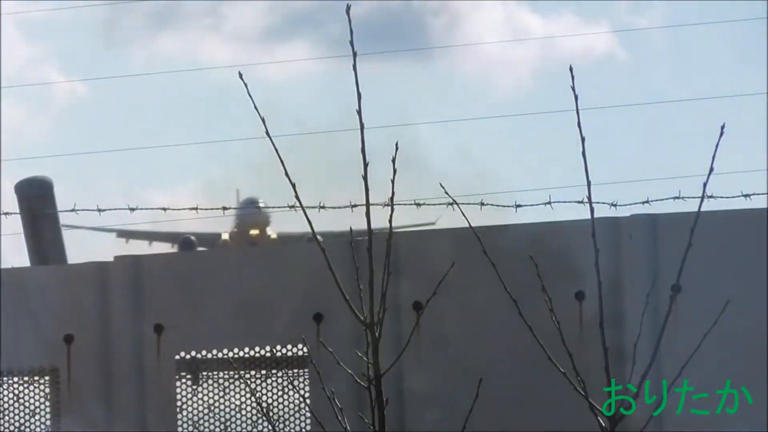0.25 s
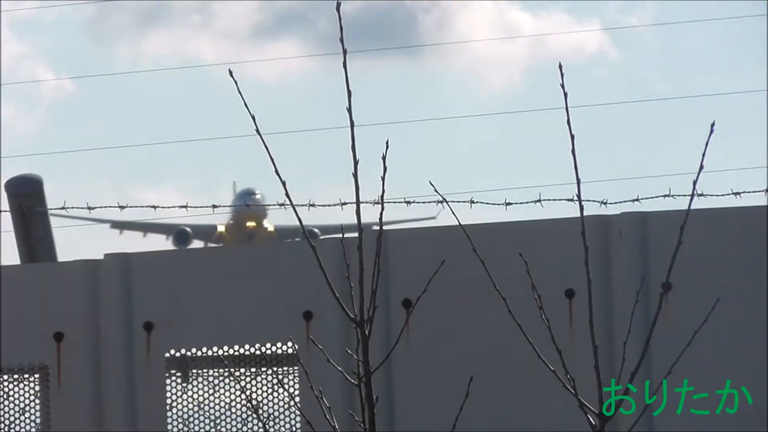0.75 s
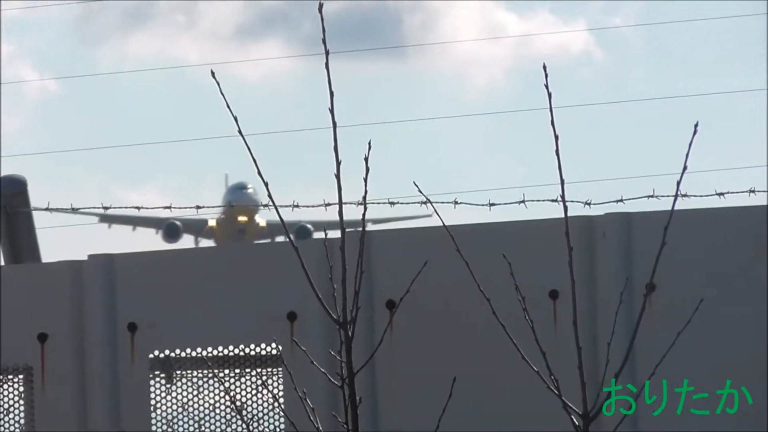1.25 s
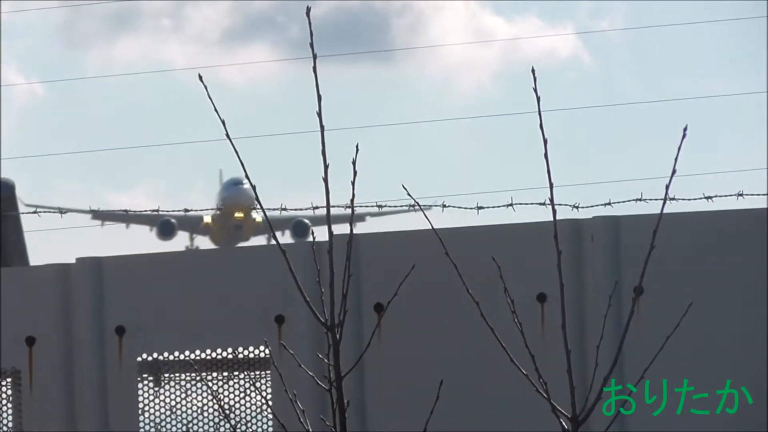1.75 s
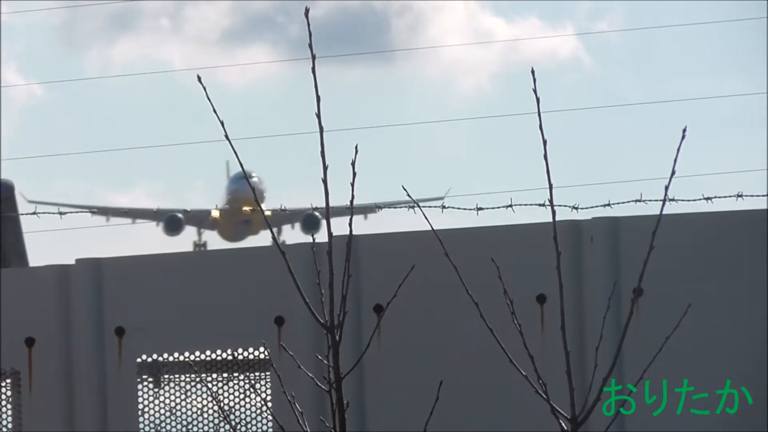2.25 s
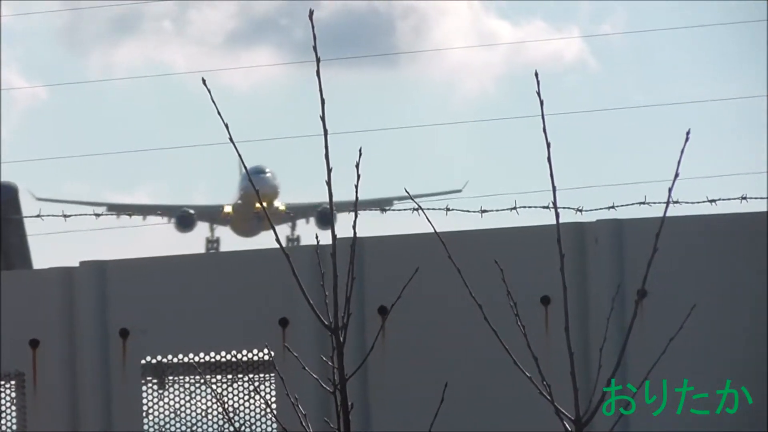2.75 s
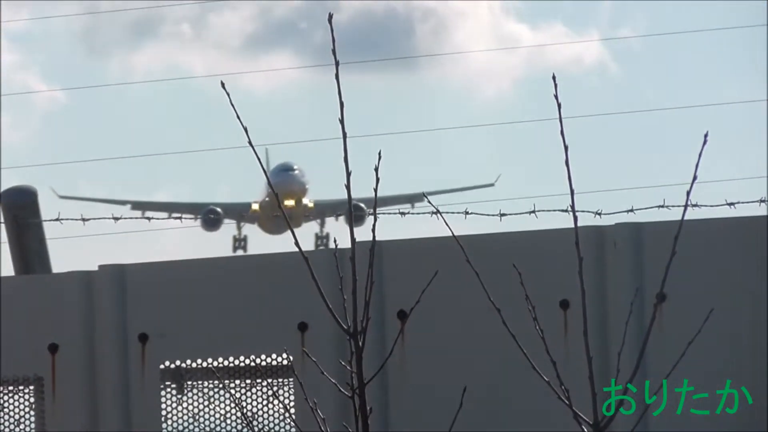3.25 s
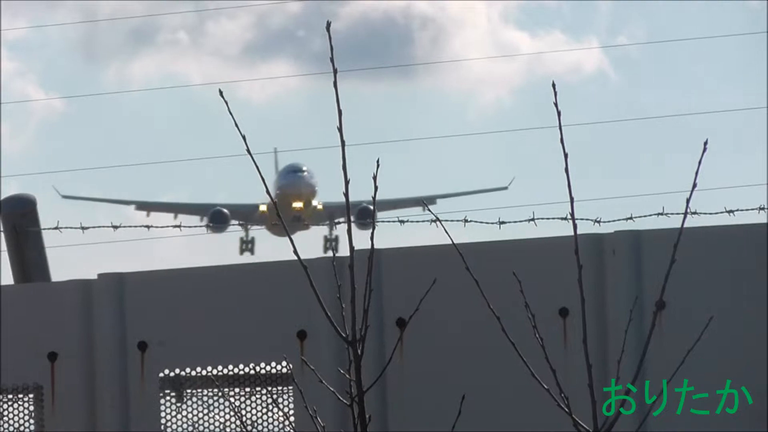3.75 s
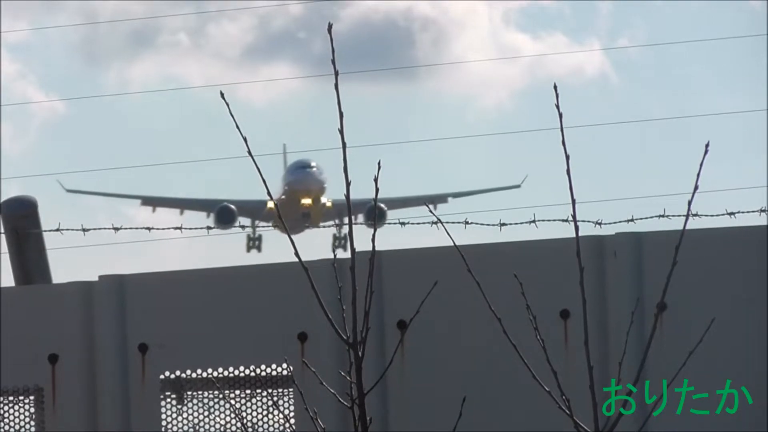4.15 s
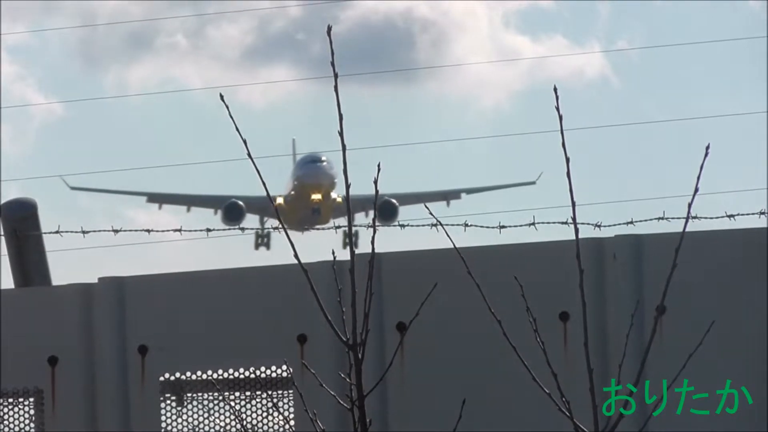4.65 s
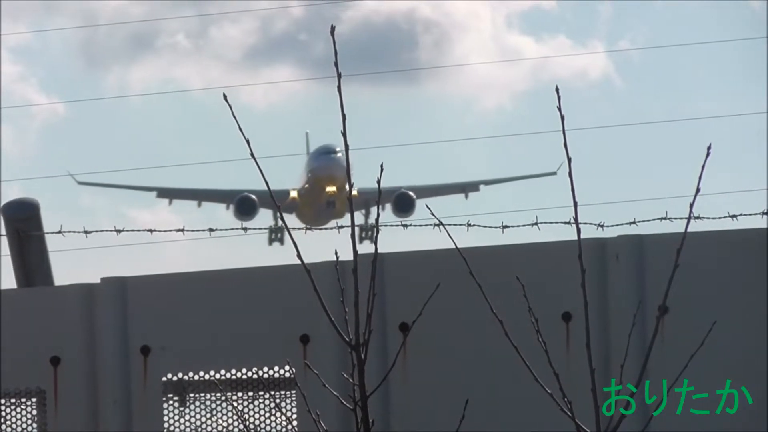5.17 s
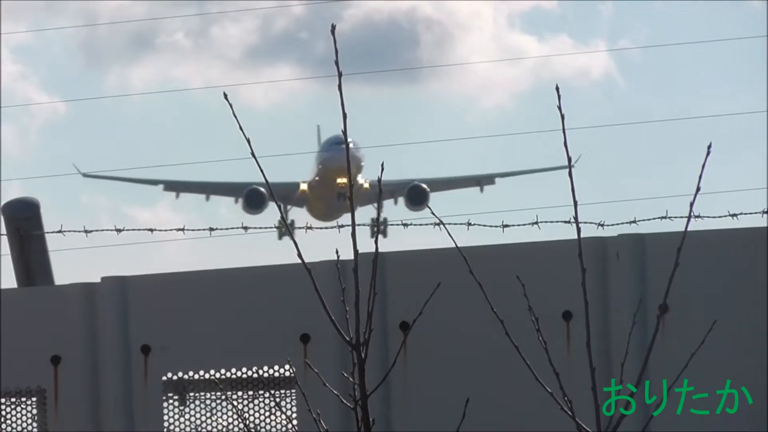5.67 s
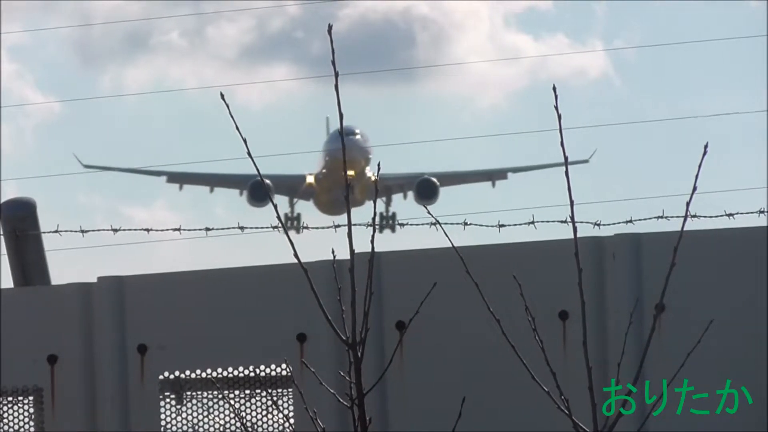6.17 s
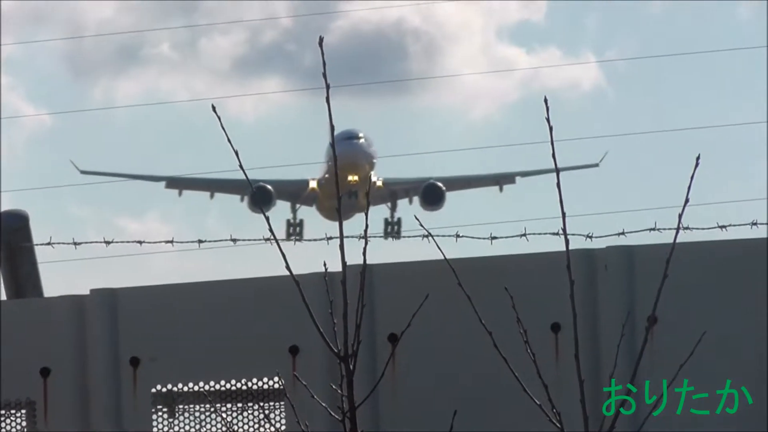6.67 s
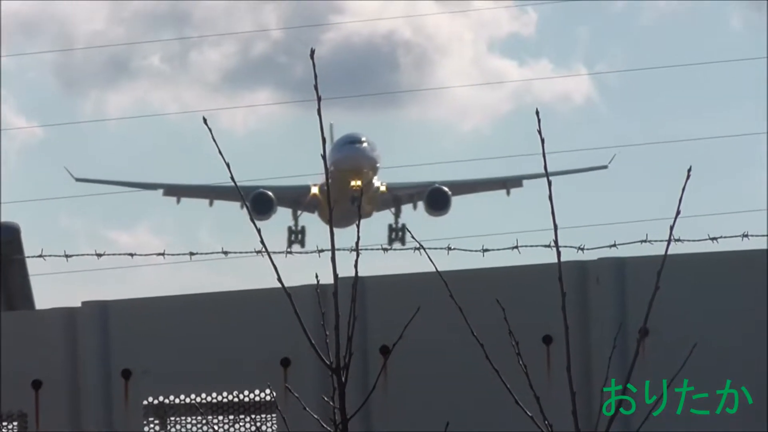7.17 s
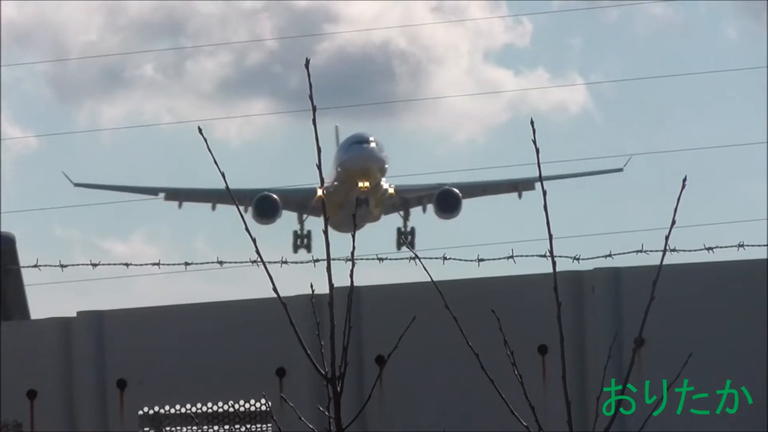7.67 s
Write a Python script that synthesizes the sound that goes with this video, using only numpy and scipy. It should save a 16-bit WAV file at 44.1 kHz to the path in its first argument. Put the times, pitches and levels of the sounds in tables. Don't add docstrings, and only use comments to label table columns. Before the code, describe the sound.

Gusty low jet rumble with a faint wavering whistle grows toward the listener, after a brief louder pass, with sharp handling clicks up close.

```python
import sys
import numpy as np
from scipy import signal
from scipy.fft import rfft, irfft
from scipy.io import wavfile
from scipy.ndimage import uniform_filter1d

SR = 44100
rng = np.random.default_rng(int(sys.argv[2]) if len(sys.argv) > 2 else 0)


def persist_wave(psi):
    counts = np.round(np.clip(psi, -1, 1) * 32767).astype(np.int16)
    wavfile.write(sys.argv[1], SR, np.atleast_2d(counts).T)


def invert_db(level):
    return 10 ** (np.asarray(level, dtype=float) / 20)


N = 349272
CUT_S = .4245


def roar(hz, t):
    # f/Hz, density/dB
    jet_spectrum = [(12, -64), (20, -28), (125, -2.5), (153, -2), (190, -3.5), (258, -8), (332, -9),
                    (361, -10), (427, -10), (706, -15), (768, -17.5), (835, -17.5), (927, -18.5),
                    (1380, -25.5), (1670, -36.5), (3000, -62.5), (3900, -59), (6600, -120)]
    # t/s, level/dB, tilt above 500 Hz/(dB/octave)
    approach_levels = [
        (.43, -23.5, 0),
        (1.5, -22.5, -1),
        (2.5, -23, 0),
        (3.5, -24.5, 0.5),
        (4.5, -25, 0.5),
        (5.5, -22.5, 0),
        (6.5, -21, -0.5),
        (7.2, -21, -0.2),
        (7.92, -20.5, 0.8),
    ]
    # t/s, spread/s, centre f/Hz, lift (negative: dip)/dB
    roar_pockets = [(0.74, 0.12, 263, 5.5), (1.85, .06, 62, 1), (3.22, 0.098, 510, 7),
                    (3.28, 0.17, 105, 9.5), (4, 0.13, 315, 5), (4.33, 0.23, 380, 5.5), (4.32, 0.8, 400, 6.5),
                    (4.54, 0.69, 59, 7), (5.05, 0.099, 476, 6), (5.28, 0.096, 260, 8.5), (5.7, 0.42, 93, 5),
                    (5.98, 0.24, 304, 7), (6.49, 0.12, 102, 7.5), (7.12, 0.12, 97, 12.5),
                    (7.35, 0.19, 435, 4.5), (7.27, 0.24, 287, 10), (7.6, 0.14, 67, 11.5),
                    (3.3, 0.11, 175, 4.5), (7.62, 0.14, 191, 5.5), (3.2, 0.079, 410, 6.5),
                    (3.18, 0.025, 480, 12), (5.27, 0.073, 395, -6), (7.75, .1, 40, -5),
                    (6.9, 0.075, 433, -4.5), (7.6, 0.13, 180, -2), (3.47, 0.12, 426, -4),
                    (3.96, 0.11, 384, -10), (3.75, 0.11, 420, 3), (4.9, 0.12, 237, 5), (5.3, 0.063, 410, 5),
                    (1.08, 0.072, 620, -5.5), (6.2, 0.13, 160, -10), (7.15, 0.15, 300, 1),
                    (6.02, 0.084, 264, -4.5), (4.2, 0.071, 390, 1.5), (4.8, 0.13, 147, -12),
                    (7.0, 0.058, 384, 6.5), (7.4, 0.097, 410, -2.5), (4.43, 0.23, 103, 4),
                    (3.7, 0.065, 310, -10), (3.31, 0.031, 460, 3), (5.91, .03, 390, 6),
                    (5.97, .03, 370, 4.5), (6.05, 0.037, 326, -2), (7.7, .12, 35, -6), (6.58, 0.089, 213, 0),
                    (2.7, .06, 160, 6), (4.4, 0.11, 270, 2), (6.17, .1, 160, -10), (7.31, 0.107, 400, -1),
                    (3.19, .03, 440, 2), (3.4, 0.047, 450, 2), (4.33, 0.056, 370, 1.5),
                     (4.15, 0.059, 315, 2), (5.88, .05, 400, 3), (5.82, .05, 330, 2), (7.12, .06, 415, 3),
                     (7.2, .06, 280, -1.5), (3.54, 0.093, 135, 1), (12, .08, 200, -3), (5.61, .08, 140, -4),
                     (7.75, .08, 50, -6), (13, 0.046, 280, 0.5), (5.5, 0.072, 195, 7), (3.7, .08, 195, 6.5),
                     (2.95, .06, 420, 2.5), (4.2, 0.088, 300, -1), (1.12, 0.072, 150, -3),
                     (7.4, .06, 200, 1.5), (1.55, 0.11, 217, 2.5), (5.3, .08, 460, -5),
                     (4.42, 0.065, 290, 4.5), (5.9, .07, 380, 1.5), (3.2, .05, 200, 3), (7.75, .06, 70, -4),
                     (7.3, .08, 440, -2.5), (5.6, .08, 77, 4), (2.9, .06, 80, -4), (5.0, .15, 2100, 2),
                     (3.2, .05, 475, 1), (6.85, .06, 294, -3), (2.27, .1, 200, -2.5)]
    level_db, tilt_db = curve(approach_levels, t)
    octaves_up = np.log2(np.maximum(hz[:, None] / 500, 1))
    db = level_db + tilt_db * octaves_up + pockets_db(roar_pockets, hz, t, octaves=0.033)
    return band_gain(read(jet_spectrum, hz)[:, None], hz, 0, SR) * invert_db(db)


def whistle(t):
    # start/s, length/s, level/dB
    cavity_flares = [(0.568, 0.055, -28), (1.057, 0.052, -35), (1.33, 0.24, -31.5), (1.66, 0.15, -35),
                     (1.97, .08, -48), (3.118, 0.33, -30), (3.466, 0.059, -27.5), (3.92, 0.35, -34.5),
                     (4.31, 0.12, -30.5), (4.55, 0.32, -33.5), (4.87, 0.13, -30), (5.175, 0.28, -33.5),
                     (5.454, 0.12, -28), (5.71, 0.14, -26.5), (5.923, 0.27, -28.5), (6.286, 0.12, -25.5),
                     (6.49, 0.11, -30.5), (6.68, 0.066, -25.5), (6.88, 0.32, -33.5), (7.223, 0.06, -29),
                     (7.39, 0.1, -33), (7.474, 0.1, -21)]
    rest_db = -44 + 1.13 * t
    level = flaring(cavity_flares, t, rest_db, edge_s=0.05)
    return level * tone(-4, 790 - 2.4 * t, waver_hz=5.5, flutter_db=3)


def hum(t):
    # start/s, length/s, level/dB, f/Hz
    core_swells = [
        (.55, 1.1, -37, 148),
        (3.5, .75, -31, 149),
        (4.55, .5, -24, 150),
        (5.98, .37, -26, 153),
    ]
    level = flaring(core_swells, t, rest_db=-46.5, edge_s=0.15)
    return level * tone(0, curve(core_swells, t)[2], waver_hz=1, flutter_db=2)


def turbine(t):
    # start/s, length/s, level/dB, f/Hz
    turbine_lines = [
        (2.25, .3, -63, 2070),
        (3.3, .3, -64, 2090),
        (4.7, .25, -60, 2120),
        (6.7, .5, -62, 2100),
        (7.3, .3, -65, 2115),
    ]
    level = flaring(turbine_lines, t, rest_db=-78, edge_s=0.093)
    return level * tone(0, curve(turbine_lines, t)[2], waver_hz=6, flutter_db=3)


def fan(t):
    # t/s, level/dB, f/Hz
    fan_levels = [(.43, -58, 975), (2.9, -55, 975), (3.2, -49, 972), (3.8, -53, 970), (4.4, -48, 972),
                  (4.9, -56, 965), (7.92, -58, 960)]
    level_db, pitch_hz = curve(fan_levels, t)
    return tone(level_db, pitch_hz, waver_hz=10, flutter_db=4)


def near_roar(hz, t):
    # f/Hz, density/dB
    near_spectrum = [(12, -50), (20, -16), (119, -8), (150, -4.5), (205, 2), (275, -1), (394, -4),
                     (479, -9), (770, -8.5), (1590, -24), (1780, -26.5), (2850, -35), (4710, -33.5),
                     (5570, -42.5), (9990, -48), (15600, -60)]
    # t/s, level/dB
    near_levels = [(0, -14), (.15, -14), (.3, -15), (.42, -14.5)]
    return band_gain(read(near_spectrum, hz)[:, None], hz, 0, SR) * invert_db(curve(near_levels, t)[0])


def near_pass():
    # t/s, spread/s, centre f/Hz, lift/dB
    near_pockets = [(0.022, 0.018, 250, 5), (0.045, .01, 620, -3), (0.098, 0.011, 260, -3),
                    (.14, 0.017, 370, 5), (0.21, 0.03, 215, 6), (0.186, 0.03, 840, 8),
                    (.215, 0.014, 570, -3), (0.32, 0.02, 290, 7.5), (0.19, .015, 310, -10),
                    (.13, .012, 180, -5), (0.22, .012, 3900, 4), (0.36, 0.042, 800, 7),
                    (0.424, 0.016, 450, 17), (0.392, 0.017, 1400, 3), (0.39, 0.031, 254, -13),
                    (.15, .04, 5700, 4), (.15, .03, 4100, 3), (.17, .03, 1500, 3), (.055, 0.0055, 700, 8),
                    (.36, .05, 5000, 2), (0.23, .03, 2400, -2), (0.33, .008, 800, -3), (.26, .03, 280, 0.5),
                    (0.14, .1, 2300, 2)]
    near = noise(near_roar, patchy_db=.7, size=2048)
    crest = -near.sum(0)[:round(.1 * SR)].argmax()
    near = np.roll(near, crest, axis=1)
    hz, t, z = signal.stft(near[:, :SR], SR, nperseg=1024, noverlap=896)
    z = z * invert_db(pockets_db(near_pockets, hz, t, octaves=0.098))
    near = signal.istft(z, SR, nperseg=1024, noverlap=896)[1][:, :SR]
    return np.pad(near, ((0, 0), (0, N - SR)))


def clicks():
    # t/s, snap/dB, shell ring/dB, tilt/(dB/octave), rattle tail/dB
    click_events = [(.2215, -32, -40, 0, -32.5), (2.4097, -29, -45, 0, -49), (2.4106, -30, -45, -3, -55),
                    (2.5936, -25, -40, 2, -52), (2.5948, -22, -40, 7, -55), (2.7132, -38, -35, 2, -43),
                    (2.7142, -21, -26, -0.5, -31), (2.8092, -29, -7, -3.5, -33),
                    (2.8140, -13, 0.5, 2.5, -29.5), (3.8735, -36, -43, -1, -48),
                    (5.572, -37, -51, -2.5, -44), (6.2236, -25, -43, -6.5, -30), (6.2255, -20, 2, 0.5, -34),
                    (6.251, -18, -12, -2.5, -30.5), (6.2705, -38, -40, 0, -44), (6.2615, -50, -50, -3, -40),
                    (2.7152, -37, -3.5, 0, -50), (2.7205, -40, -40, 0, -34.5), (2.8165, -40, -30, -3, -34)]
    # f/Hz, level/dB
    snap_spectrum = [(1300, -9.5), (2100, -2), (2900, -2.5), (3800, -1), (5000, -1.5), (6600, -6.5),
                     (8800, -2.5), (11000, -6), (13000, -9), (16000, -11)]
    # f/Hz, level/dB
    shell_modes = [(835, -9), (900, -6.5)]
    spike_height, spike_s = 7, .0004
    latch_hz, latch_width_hz, latch_db = 3880, 810, 2.5
    shell_rise_s, shell_left_db, snap_left_db = 0.0012, -9, 2
    out, t = np.zeros((2, N + 2048)), np.arange(2048) / SR
    hz = np.fft.rfftfreq(2048, 1 / SR)
    grit = rng.standard_normal((len(click_events), 3, 2048))
    grit[:, 0, round(spike_s * SR)] += spike_height

    late = np.maximum(t - .0006, 0) / shell_rise_s
    swing = sum(invert_db(db) * np.exp(2j * np.pi * f * t) for f, db in shell_modes) * late * np.exp(1 - late)
    swing = (swing * np.array([[1j * invert_db(shell_left_db)], [1]])).real

    hump_db = latch_db * np.exp(-((hz - latch_hz) / latch_width_hz) ** 2)
    sides = invert_db([[snap_left_db / 2], [-snap_left_db / 2]])
    low_fade = np.exp(-(t / 0.0091) ** 1.9)
    treble_fade = np.exp(-(t / 0.0083) ** 3)
    for (s, snap_db, ring_db, tilt_db, tail_db), (both, left, right) in zip(click_events, grit):
        colour_db = read(snap_spectrum, hz) + tilt_db * np.log2((hz + 50) / 5000) + hump_db
        stereo_grit = 0.55 * both + 0.91 * np.array([left, right])
        crack = irfft(rfft(stereo_grit) * evened(invert_db(colour_db)))
        snap = invert_db(snap_db - 60 * t / .005) * (1 - np.exp(-t / .0005))
        low = irfft(rfft(crack) / (1 + (hz / 5500) ** 4))
        rattle = low * low_fade + (crack - low) * treble_fade
        at = round(s * SR)
        out[:, at:at + 2048] += (crack * snap + invert_db(tail_db) * rattle) * sides + invert_db(ring_db) * swing
    return out[:, :N]


def rings():
    # t/s, f/Hz, level/dB, t60/s, left minus right/dB
    ring_events = [(2.4097, 2200, -32, .012, 6), (2.4097, 6000, -38, .01, 4), (2.4097, 4950, -27, .01, 4),
                   (2.4097, 8000, -30, .01, 7), (2.5938, 1550, -21, 0.014, 0),
                   (2.5945, 2330, -23.5, 0.017, 0), (2.5938, 5050, -30, .01, 10),
                   (2.5938, 6700, -28, .01, 10), (2.594, 9100, -21, 0.007, 7),
                   (2.7144, 2150, -29, .035, -6), (2.7144, 3130, -33, .02, 5),
                   (2.7175, 3900, -32, 0.079, 0), (2.7144, 4330, -37, .03, 2), (2.7144, 6000, -38, .04, 0),
                   (2.7132, 8300, -29, .03, 0), (2.8095, 2310, -29, 0.036, -4),
                   (2.8095, 4620, -33, 0.026, 8), (2.814, 3550, -28, 0.022, 7), (2.814, 4100, -33, .04, 1),
                   (2.814, 5000, -29, .025, 9), (2.814, 5900, -25, .02, 11), (2.814, 8300, -17, 0.012, -1),
                   (6.2256, 2400, -37, .06, -10), (6.2254, 3550, -23, .021, 4), (6.2256, 4000, -35, .1, 3),
                   (6.2256, 4380, -32, .03, 7), (6.2256, 6200, -29, .02, 8), (6.2256, 9400, -30, .012, 5),
                   (6.2511, 1480, -19, 0.033, -3), (6.2511, 3180, -32, .025, -9),
                   (6.2511, 2700, -25, .025, -4), (6.2511, 3750, -27, .02, 0),
                   (6.2511, 4020, -23, 0.027, 0), (6.2511, 7600, -32, .012, -2),
                   (3.899, 8000, -40, .008, 0), (2.4097, 9900, -33, .01, 5), (2.594, 12700, -28, .008, 5),
                   (2.5945, 5900, -32, .012, 6), (6.2511, 5200, -36, .02, 5),
                   (2.814, 12500, -26, 0.0072, 3)]
    ragged_share, stutter_s, rise_s = 0.45, 0.0019, 0.0004
    out, t = np.zeros((2, N)), np.arange(4096) / SR
    shake = rng.standard_normal((len(ring_events), 4096, 2)) @ [1, 1j]
    shake = evened(uniform_filter1d(shake, round(stutter_s * SR)))
    phases = rng.random((len(ring_events), 2))
    loose = ragged_share * np.minimum(t / .004, 1)
    for (s, hz, db, t60, left_db), turns, stutter in zip(ring_events, phases, shake):
        fade = invert_db(db - 60 * t / t60) * (1 - np.exp(-t / rise_s))
        cycles = hz * t + turns[0] + np.array([[0], [turns[1] / 3]])
        note = (1 - loose + loose * stutter) * np.exp(2j * np.pi * cycles)
        at = round(s * SR)
        out[:, at:at + len(t)] += invert_db([[left_db / 2], [-left_db / 2]]) * fade * note.real
    return out


def hiss(hz, t):
    # f/Hz, density/dB
    floor_spectrum = [(1000, -20), (1700, -8.5), (2080, -3.5), (2290, -8), (2990, -11.5), (4380, -10),
                      (6530, -15.5), (9370, -12), (11000, -15), (12300, -14.5), (13500, -19.5),
                      (15600, -22.5)]
    breeze_s, breeze_spread_s, breeze_db = 4.54, 0.24, 2
    db = -51 + breeze_db * np.exp(-.5 * ((t - breeze_s) / breeze_spread_s) ** 2)
    return band_gain(read(floor_spectrum, hz)[:, None], hz, 3000, 15000) * invert_db(db)


def noise(shape, patchy_db, size):
    # f/Hz, likeness/(0-1)
    port_likeness = [(30, .4), (45, .75), (65, .92), (120, .945), (300, .91), (550, .82), (850, .55),
                     (2000, .55), (2800, .5), (4000, .5), (7700, .5), (9500, .15), (11500, 0), (15000, .08)]
    # f/Hz, left minus right/dB
    port_balance = [(30, -.8), (110, 0), (380, -1), (700, 1), (1290, 2), (2380, .5), (4400, -1.2),
                    (8120, .3), (11000, 2), (12200, .5), (13300, 3.5), (14500, 1)]
    lag_s = 4.6e-5
    hop = size // 4
    frames, hz = N // hop + 5, np.fft.rfftfreq(size, 1 / SR)
    a, b, c, d, patches = rng.standard_normal((frames, len(hz), 5)).T
    patches = evened(uniform_filter1d(uniform_filter1d(patches, size=8, axis=0), size=12, axis=1))
    same = np.clip(read(port_likeness, hz), 0, 1)[:, None]
    left = a + 1j * b
    lead = np.exp(2j * np.pi * hz * lag_s)[:, None]
    right = same * left * lead + np.sqrt(1 - same ** 2) * (c + 1j * d)
    lean = invert_db(read(port_balance, hz) / 2)[:, None]
    z = np.array([left * lean, right / lean]) * shape(hz, np.arange(frames) * hop / SR)
    z = z * invert_db(patchy_db * patches)
    return signal.istft(z, nperseg=size, noverlap=size - hop)[1][:, :N] * np.sqrt(3 / 2)


def tone(db, hz, waver_hz, flutter_db):
    shake = rng.standard_normal((4, N // 64 + 1))
    shake = evened(uniform_filter1d(uniform_filter1d(shake, size=24), size=24))
    pitch, both, left, right = (np.interp(np.arange(N) / 64, np.arange(len(row)), row) for row in shake)
    turn = 2 * np.pi * np.cumsum(hz + waver_hz * pitch) / SR
    return np.sqrt(2) * invert_db(db + flutter_db * both) * np.sin(turn + .4 * np.array([left, right]))


def flaring(rows, t, rest_db, edge_s):
    gain = invert_db(rest_db)
    for s, length_s, db, *_ in rows:
        edge = np.minimum(t - s, s + length_s - t) / edge_s
        gain = np.maximum(gain, invert_db(db) * np.clip(edge + .5, 0, 1))
    return gain


def pockets_db(rows, hz, t, octaves):
    db = np.zeros((len(hz), len(t)))
    for s, spread_s, centre_hz, lift_db in rows:
        spread_octaves = octaves + 1.013 * spread_s
        in_time = np.exp(-.5 * ((t - s) / spread_s) ** 2)
        in_band = np.exp(-.5 * (np.log2((hz[:, None] + 1) / centre_hz) / spread_octaves) ** 2)
        db += lift_db * in_time * in_band
    return db


def band_gain(db, hz, lo_hz, hi_hz):
    gain = invert_db(db) * np.ones((len(hz), 1))
    return gain / np.sqrt((gain[(hz >= lo_hz) & (hz < hi_hz)] ** 2).sum(0))


def read(points, hz):
    f, value = np.transpose(points)
    return np.interp(np.log(hz + 1), np.log(f + 1), value)


def curve(rows, t):
    s, *columns = np.transpose(rows)
    return [np.interp(t, s, c) for c in columns]


def evened(x):
    return x / np.sqrt(np.mean(np.abs(x) ** 2) + 1e-20)


def scene():
    t = np.arange(N) / SR
    after = np.clip((t - CUT_S) / .001, 0, 1)
    approach = noise(roar, patchy_db=1.1, size=2048) + whistle(t) + hum(t) + turbine(t) + fan(t)
    approach = approach + noise(hiss, patchy_db=.4, size=1024)
    return after * approach + (1 - after) * near_pass() + clicks() + rings()


def low_pass(x):
    return signal.sosfilt(signal.butter(12, 15760, fs=SR, output="sos"), x)


def record(dry):
    dry = signal.sosfilt(signal.butter(2, 34, "high", fs=SR, output="sos"), dry)
    lowpass = signal.firwin(511, 15650, window=("kaiser", 9), fs=SR)[None]
    dry = signal.oaconvolve(np.pad(dry, ((0, 0), (255, 255)), "reflect"), lowpass, "valid")
    peak_db = 20 * np.log10(abs(dry).max(0) + 1e-6)
    peak_db[:round(CUT_S * SR)] = -60
    fall_db = np.arange(N) * 16. / SR
    held_db = np.maximum.accumulate(peak_db + fall_db) - fall_db
    over_db = np.maximum(held_db + 4.0, 0)
    ducked = dry / invert_db(.7 * signal.lfilter([.004], [1, -.996], over_db))
    return low_pass(np.clip(ducked, -.98, .98))


dry = scene()
out = record(dry)
persist_wave(out)
```